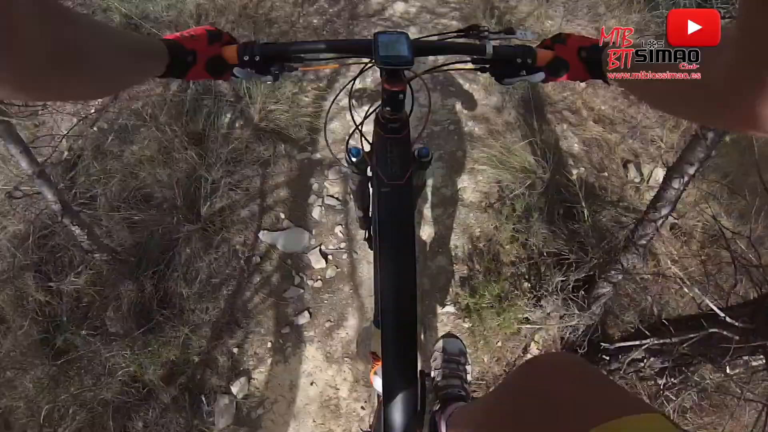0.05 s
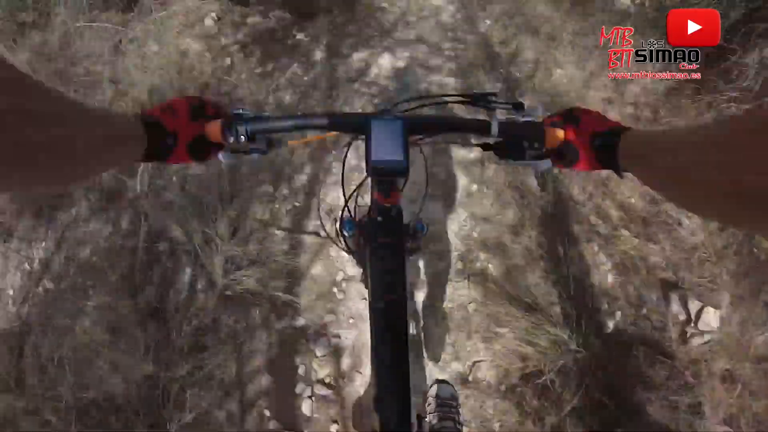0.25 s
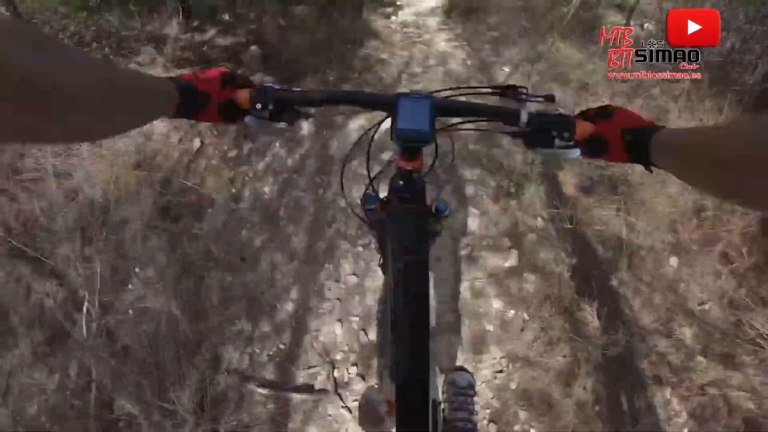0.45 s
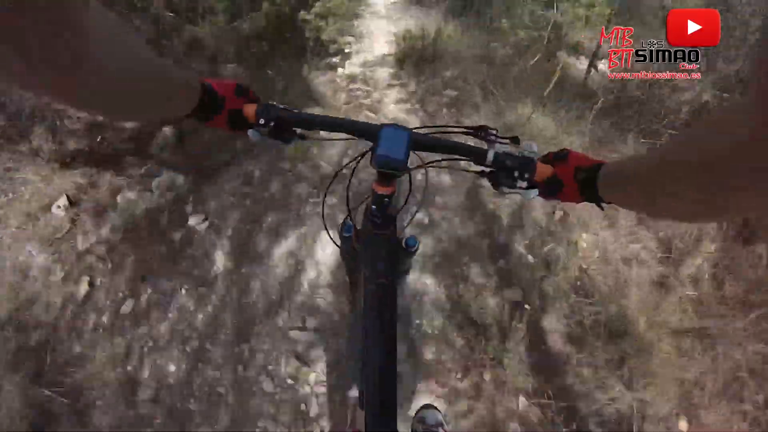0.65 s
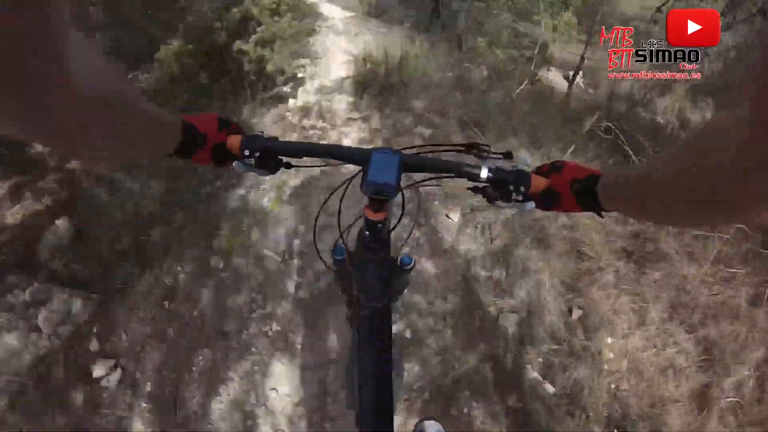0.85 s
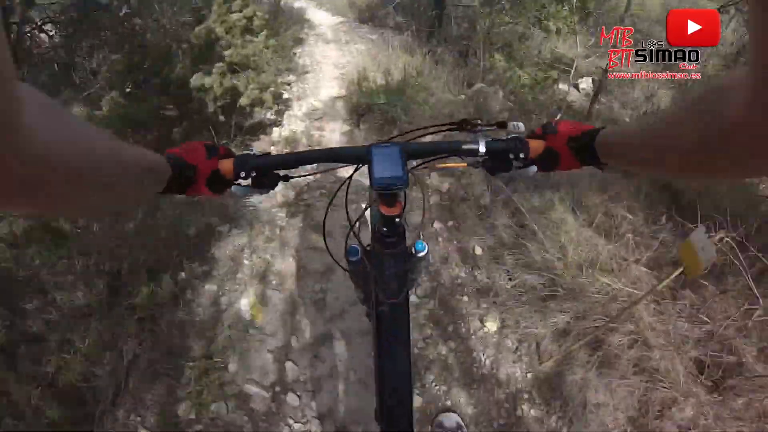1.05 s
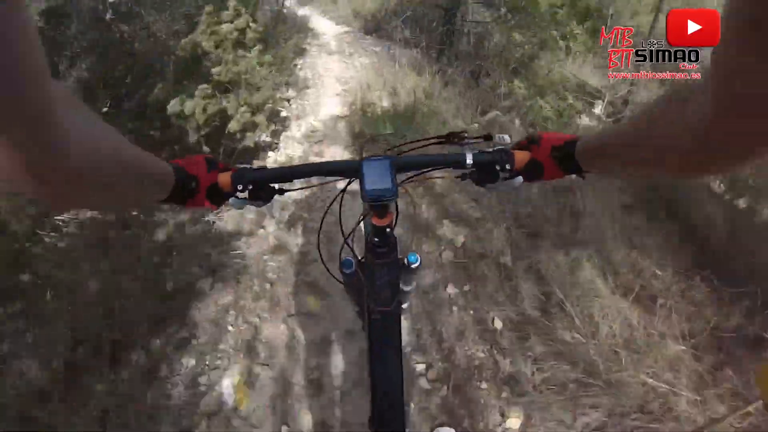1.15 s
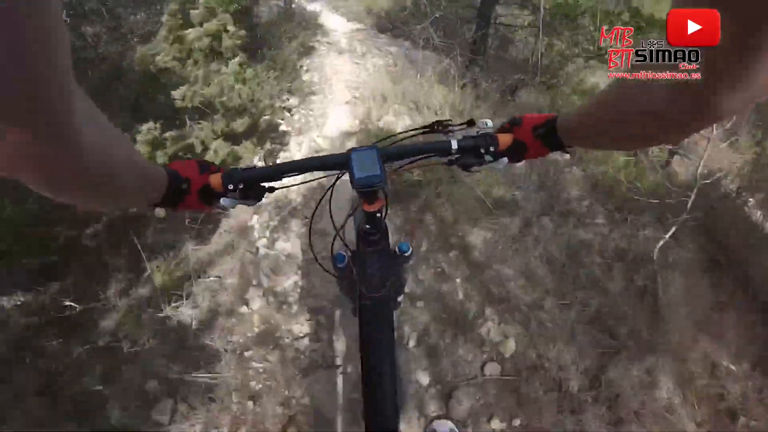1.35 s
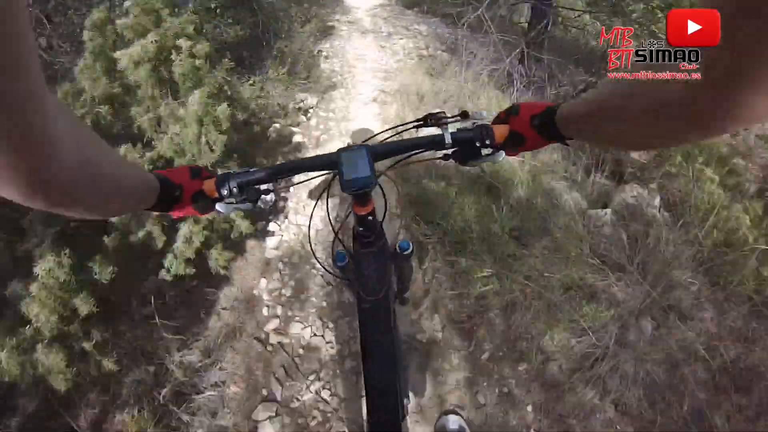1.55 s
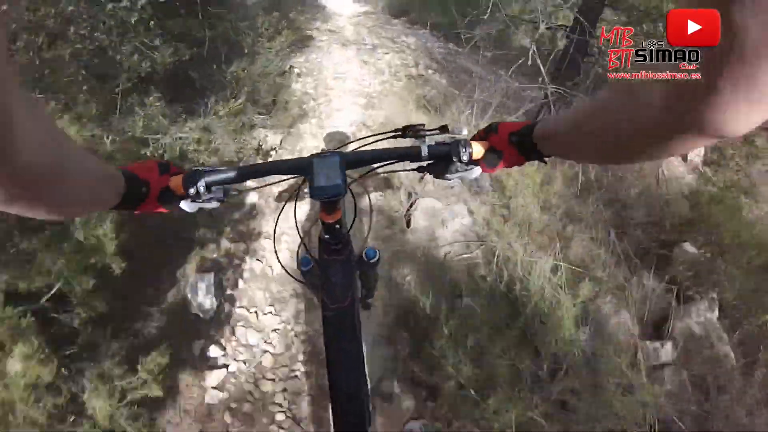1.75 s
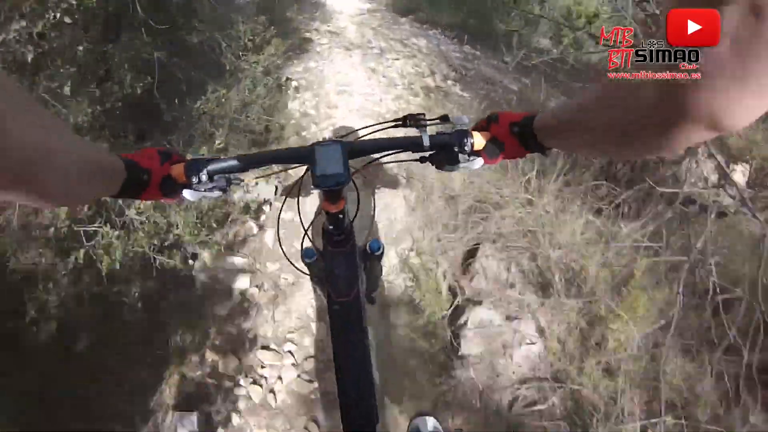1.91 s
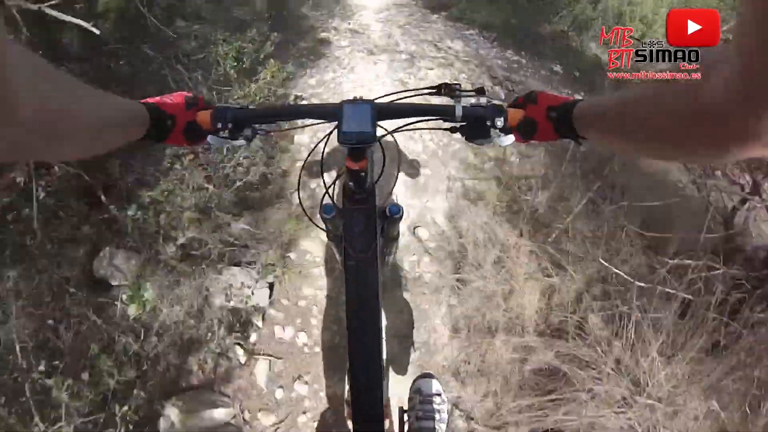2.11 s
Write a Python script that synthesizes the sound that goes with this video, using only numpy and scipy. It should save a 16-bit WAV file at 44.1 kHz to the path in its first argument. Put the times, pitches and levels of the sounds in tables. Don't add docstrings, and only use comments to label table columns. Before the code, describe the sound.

A mountain bike rolls down a rocky trail, heard by a housed microphone on the rider's chest: thumps and rattling knocks crowd the first half second, then quiet scuffing, a few later thumps, low rumble and soft hiss.

```python
import sys
import numpy as np
from scipy import signal
from scipy.io import wavfile

SR = 44100
rng = np.random.default_rng(int(sys.argv[2]) if len(sys.argv) > 2 else 0)


def digitize_waveform(pressure):
    field = np.atleast_2d(pressure).T
    bounded = np.clip(field, -1, 1)
    quanta = np.round(bounded * 32767).astype(np.int16)
    wavfile.write(sys.argv[1], SR, quanta)


def voltage_ratio(level):
    return 10 ** (np.asarray(level, float) / 20)


N = 96005

# time in seconds, level in dB.
SWAY_CURVE = [(0, -42), (.12, -48.5), (.2, -50), (.55, -52), (.7, -58), (1.1, -61), (1.4, -56),
              (1.6, -50.5), (1.75, -52), (1.9, -53), (2.05, -43.5), (2.18, -62)]
# start in seconds, peak in dB, pitch in Hz, dying time in seconds.
STONE_JOLTS = [(0.025, -45, 20, 0.0069), (.07, -34.5, 89, 0.0049), (.095, -55, 242, .008),
               (0.2232, -34, 70, 0.0076), (0.2247, -30.5, 126.7, 0.0057), (.226, -47, 293, 0.0032),
               (0.289, -52, 101, 0.018), (0.438, -43, 312, 0.012), (0.457, -31.5, 114.4, .01),
               (0.481, -32.5, 124, 0.01), (0.489, -32, 16.13, 0.023), (0.551, -44.5, 51, 0.014),
               (.585, -45.5, 122, 0.0071), (1.005, -52.5, 108, 0.0071), (1.206, -55.5, 75, .012),
               (1.521, -35.5, 109, 0.0041), (1.526, -55, 275, 0.006), (1.522, -32, 41, 0.01),
               (1.326, -57, 70, 0.01), (1.349, -59, 135, 0.017), (1.634, -54, 118, 0.016),
               (1.841, -54.5, 118, 0.021), (1.893, -42, 28, 0.019), (1.921, -38.5, 120, 0.0077),
               (1.927, -56, 277, 0.0039), (2.048, -50, 135, 0.0082), (2.101, -42.5, 90, 0.0056)]
# start in seconds, peak in dB, favoured pitch in Hz,
# rattle length in seconds.
SHELL_KNOCKS = [(.083, -55, 2320, 0.0062), (0.093, -48, 2340, .004), (0.138, -51, 6200, 0.0021),
                (.164, -65, 3780, 0.0011), (0.183, -57.5, 1300, 0.0036), (.228, -47.5, 930, 0.0028),
                (0.261, -43.5, 2980, 0.0018), (0.265, -44.5, 1050, 0.0016), (.275, -45, 1400, .002),
                (0.276, -45, 3650, .005), (0.325, -41, 5340, 0.0019), (.328, -37.5, 1300, 0.0059),
                (0.366, -49, 4440, 0.0024), (0.437, -51, 2100, 0.00158), (.441, -24, 2480, .0035),
                (.447, -24.5, 2800, .0025), (0.447, -30, 7140, .0015), (0.456, -66, 2100, 0.0013),
                (0.488, -45, 1450, 0.0027), (.591, -45.5, 1240, .0015), (0.634, -56, 1440, 0.00315),
                (.709, -52, 1540, .002), (.765, -58.5, 2330, 0.003), (1.259, -72, 2340, 0.0037),
                (1.476, -52.5, 2190, .004), (1.482, -58, 1440, 0.0039), (1.736, -53, 3620, 0.0017),
                (2.005, -48.5, 1740, 0.00149), (2.015, -50.5, 2100, .0015)]
# start in seconds, length in seconds, level in dB,
# brightness in dB per octave.
RUB_STROKES = [(0, 0.0088, -55, -3.5), (0.02, 0.099, -63, 2), (0.081, 0.014, -58, 0.5),
               (0.126, 0.053, -67, 0), (0.245, 0.051, -60, -0.5), (.318, 0.025, -58, -0.5),
               (0.358, 0.085, -64.5, 2), (0.419, 0.056, -51, -2.5), (0.466, 0.037, -55, -2),
               (0.514, 0.094, -64.5, 1.5), (0.597, 0.082, -70.5, -2), (0.716, 0.07, -67.5, -4),
               (0.892, 0.09, -74.5, 2.5), (1.002, 0.055, -76.5, 0.5), (1.066, 0.037, -69.5, 1.5),
               (1.155, 0.062, -72.5, 3), (1.257, 0.051, -62.5, -1), (1.317, 0.085, -70, -0.5),
               (1.465, 0.021, -66, 1.5), (1.53, 0.059, -61.5, 1.5), (1.593, 0.087, -59.5, 0),
               (1.707, 0.073, -76.5, 3), (1.795, 0.088, -69.5, 4.5), (1.893, 0.078, -70.5, 3),
               (1.976, 0.0916, -63.5, 1), (2.08, 0.084, -69, 3.5)]
# pitch in Hz, width in Hz, level in dB.
HOUSING_MODES = [(322.4, 57.3, 3), (804, 590, -10.5), (1218, 252, -3), (1482, 93, -0.5), (2100, 257, -5),
                 (2450, 219, -2), (3187, 250, -15.5), (3912, 280, -16), (4890, 430, -18), (5470, 570, -21),
                 (7330, 1060, -26.5), (11160, 1000, -33.5)]

SKIRT = 4.74
TIME = np.arange(N) / SR


def rms_one(x):
    return x / np.sqrt(np.mean(x ** 2) + 1e-20)


def drift(rate):
    r = np.exp(-80 * np.pi * rate / SR)
    noise = rng.standard_normal(N // 40 + 2002)
    slow = signal.lfilter([1], [1, -2 * r, r * r], noise)[2000:]
    return np.interp(np.arange(N) / 40, np.arange(len(slow)), rms_one(slow))


def resonance(x, hz, width_hz):
    r = np.exp(-np.pi * width_hz / SR)
    poles = [1, -2 * r * np.cos(2 * np.pi * hz / SR), r * r]
    return signal.lfilter(np.array([1, 0, -1]) * (1 - r * r) / 2, poles, x + 1e-18)


def ringing_noise(hz, width_hz):
    once = resonance(rng.standard_normal(N), hz, width_hz)
    return rms_one(resonance(once, hz, width_hz))


def housing_mode(x, hz, width_hz):
    return resonance(resonance(x, hz, width_hz), hz, SKIRT * width_hz)


def low_noise(hz):
    band = signal.butter(2, [8, hz], "band", fs=SR, output="sos")
    return rms_one(signal.sosfilt(band, rng.standard_normal(N + SR))[SR:])


def rub_pressure(octaves):
    rise_s, fall_s, rest_db = 0.023, 0.024, -73.5
    t = np.arange(0, N + 16, 16) / SR
    power = voltage_ratio(2 * rest_db)
    for start, length, db, bright_db in RUB_STROKES:
        rise = (t - start) / rise_s + 0.5
        fall = (start + length - t) / fall_s + 0.5
        press = np.clip(np.minimum(rise, fall), 0, 1)
        power = power + voltage_ratio(2 * (db + bright_db * octaves)) * press ** 2
    return np.interp(TIME, t, 10 * np.log10(power))


def hiss():
    dull = signal.butter(1, 9700, fs=SR, output="sos")
    return voltage_ratio(-85.5) * rms_one(signal.sosfilt(dull, rng.standard_normal(N)))


def rumble():
    sway_lumps_db, mount_lumps_db = 0, 4
    sway_s, sway_db = np.transpose(SWAY_CURVE)
    sway_level_db = np.interp(TIME, sway_s, sway_db) + sway_lumps_db * drift(6.9)
    sway = voltage_ratio(sway_level_db) * low_noise(23)
    shake = voltage_ratio(-75) * low_noise(214)
    mount = voltage_ratio(-68) * ringing_noise(122.6, 44.4)
    rub_db = rub_pressure(0)
    rough_db = 0.67 * (rub_db - rub_db.mean())
    return sway + voltage_ratio(rough_db + mount_lumps_db * drift(9)) * (mount + shake)


def squeak():
    start_s, length_s = 2.09, 0.09
    phase = np.clip((TIME - start_s) / length_s, 0, 1)
    swell = np.sqrt(np.sin(np.pi * phase) + 1e-12)
    return voltage_ratio(-72) * swell * ringing_noise(2050, 70)


def jolts():
    stiffening = 0.19
    out = np.zeros(N)
    for start, db, hz, dying in STONE_JOLTS:
        age = np.maximum(TIME - start, 0)
        swell = (age / dying * np.exp(1 - age / dying)) ** 1.4
        swing = -swell * np.sin(2 * np.pi * hz * age)
        out += voltage_ratio(db) * (swing + stiffening * swing ** 2)
    return out


def knocks():
    clicks_each, favour_db, reach_octaves, spread_db = 10, 6.5, 0.67, 4
    start, peak_db, pitch, length = np.transpose(SHELL_KNOCKS)[:, :, None]
    lateness = rng.random((len(SHELL_KNOCKS), clicks_each)) ** 2
    luck = rng.standard_normal((len(SHELL_KNOCKS), len(HOUSING_MODES), clicks_each))
    luck = luck / np.sqrt(np.mean(luck ** 2, axis=2, keepdims=True))
    at = np.clip((start + 2 * length * lateness) * SR, 0, N - 1).astype(int)
    out = np.zeros(N)
    for k, (hz, width_hz, db) in enumerate(HOUSING_MODES):
        distance = np.log2(hz / pitch) / reach_octaves
        near_db = -favour_db * np.minimum(distance ** 2, 3)
        clicks = np.zeros(N)
        np.add.at(clicks, at, voltage_ratio(peak_db + near_db - spread_db * lateness) * luck[:, k])
        out += voltage_ratio(db + 24.5) * housing_mode(clicks, hz, width_hz)
    blunt = signal.butter(2, 7440, fs=SR, output="sos")
    return signal.sosfilt(blunt, out)


def rubbing():
    grains_per_s, spread_db, flicker_db, gust_db = 5000, 2, 1, 0.5
    sizes = voltage_ratio(spread_db * np.minimum(rng.exponential(1, (2, N)), 5))
    sizes = sizes * rng.choice([-1, 1], (2, N))
    struck = rng.random((2, N)) < grains_per_s / SR
    grains = rms_one(sizes * struck) * voltage_ratio(flicker_db * drift(28))
    out = np.zeros(N)
    for k, (hz, width_hz, db) in enumerate(HOUSING_MODES):
        octaves = max(np.log2(hz / 2000), 0)
        level_db = db + gust_db * drift(14) + rub_pressure(octaves) + 14.5
        ring = housing_mode(grains[k // 2 % 2], hz, width_hz)
        out += (-1) ** k * voltage_ratio(level_db) * ring
    return out


def scene():
    return (hiss() + rubbing() + squeak() + knocks() + jolts() + rumble())[None]


def roll_off(x):
    return signal.sosfilt(signal.butter(12, 13040, fs=SR, output="sos"), x)


def record(dry):
    top_cut = signal.ellip(12, 0.5, 45, 13020, fs=SR, output="sos")
    mix = signal.sosfilt(top_cut, dry)
    return roll_off(mix)


dry = scene()
out = record(dry)
digitize_waveform(out)
```